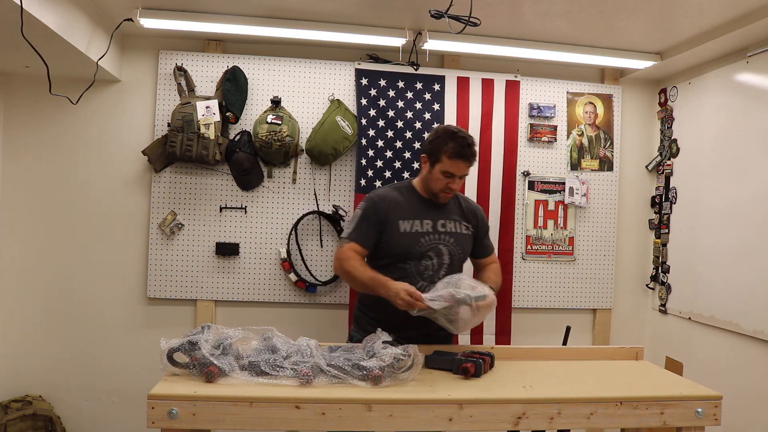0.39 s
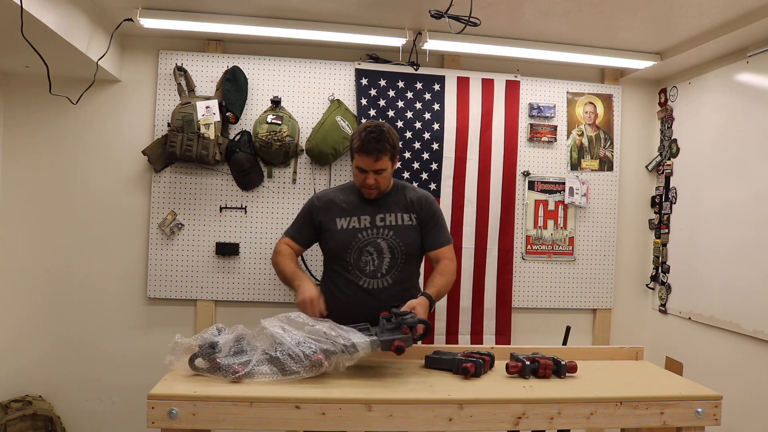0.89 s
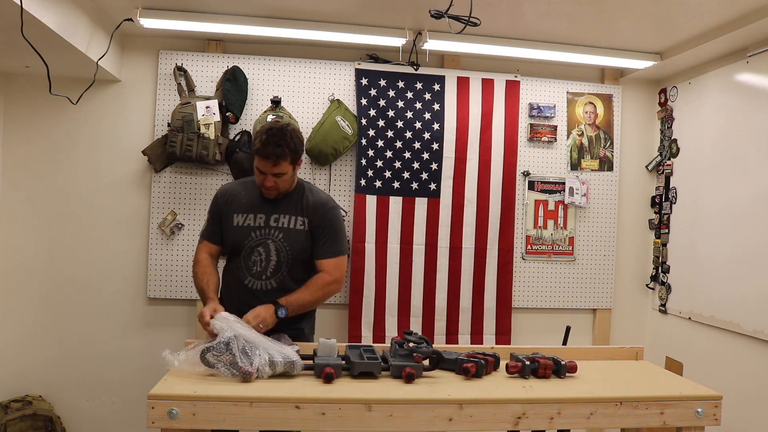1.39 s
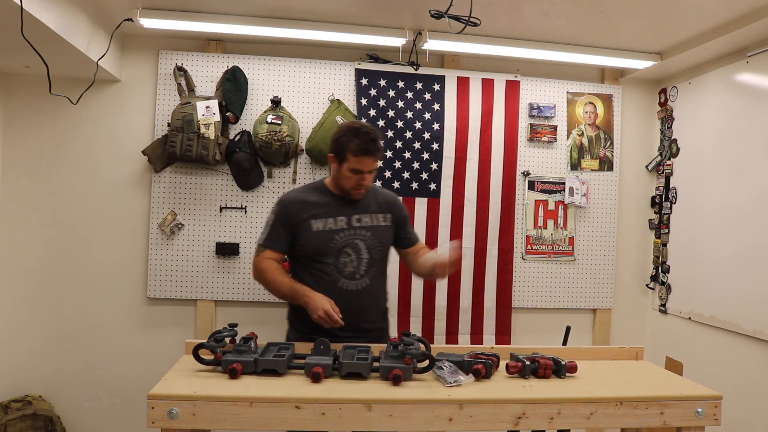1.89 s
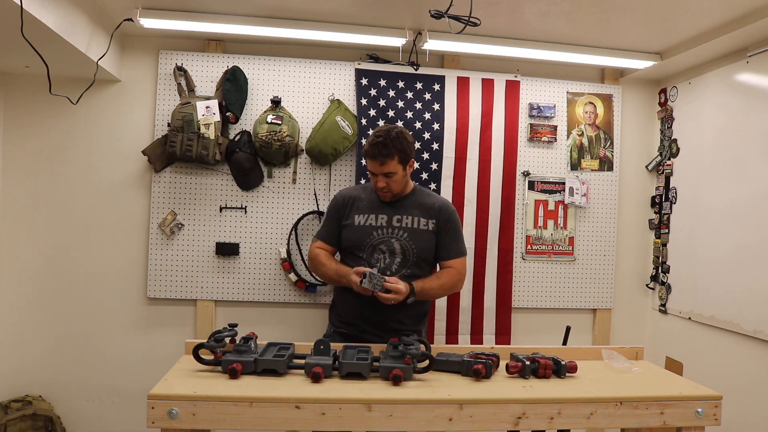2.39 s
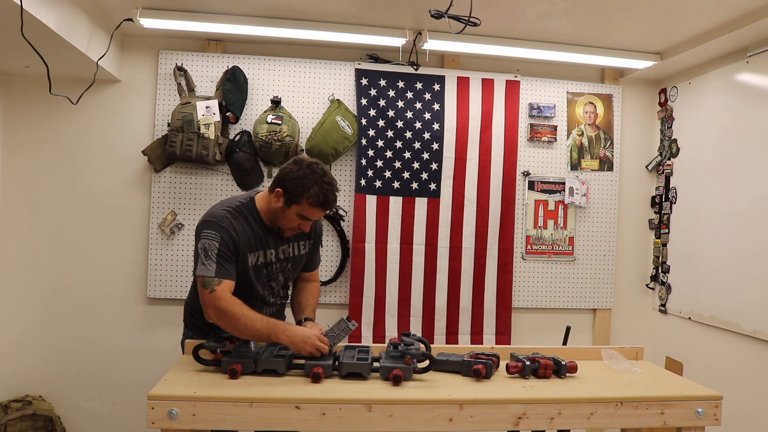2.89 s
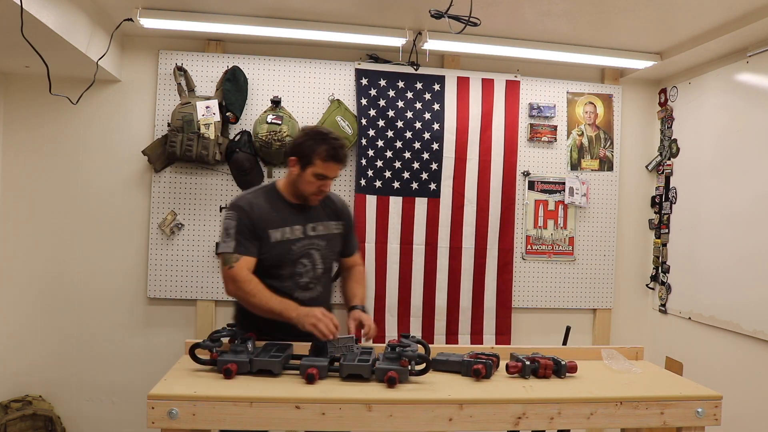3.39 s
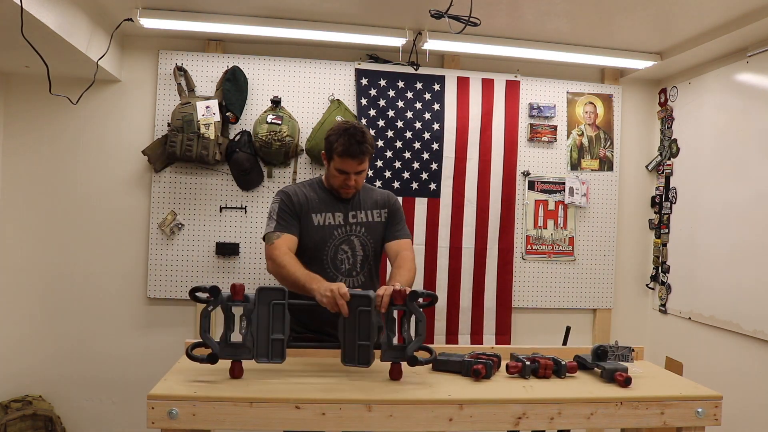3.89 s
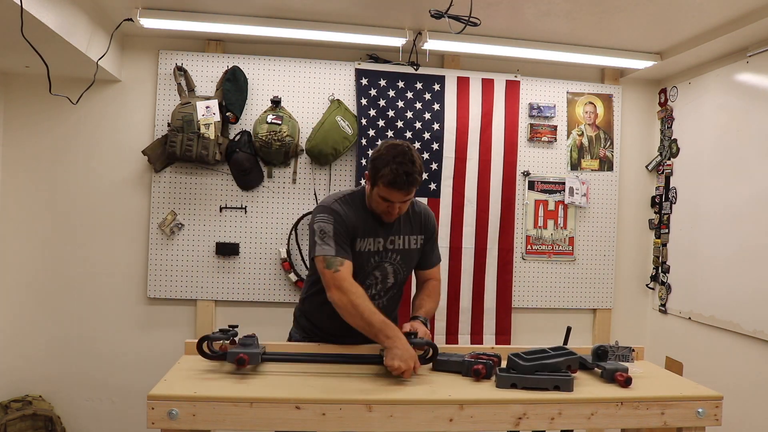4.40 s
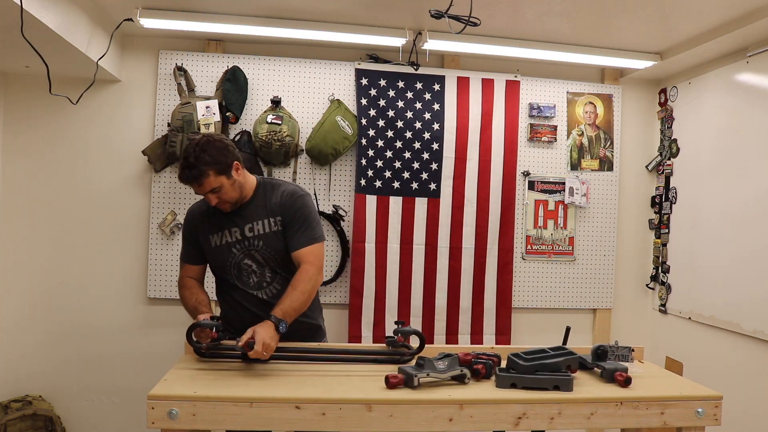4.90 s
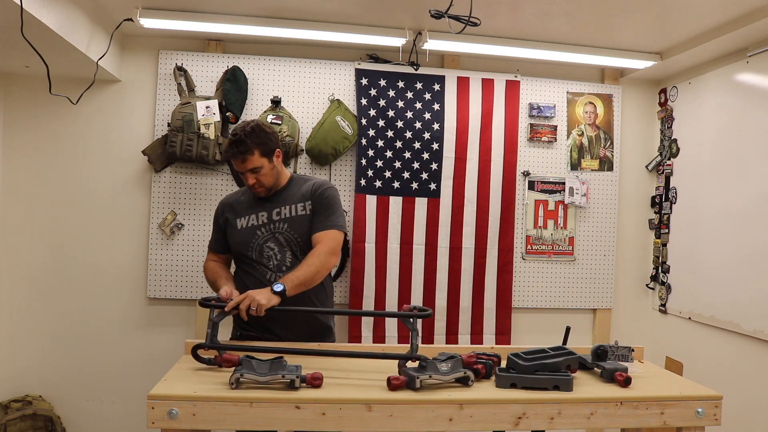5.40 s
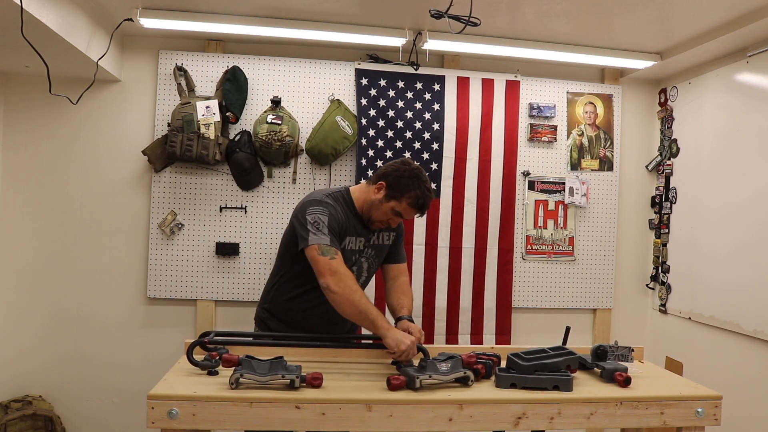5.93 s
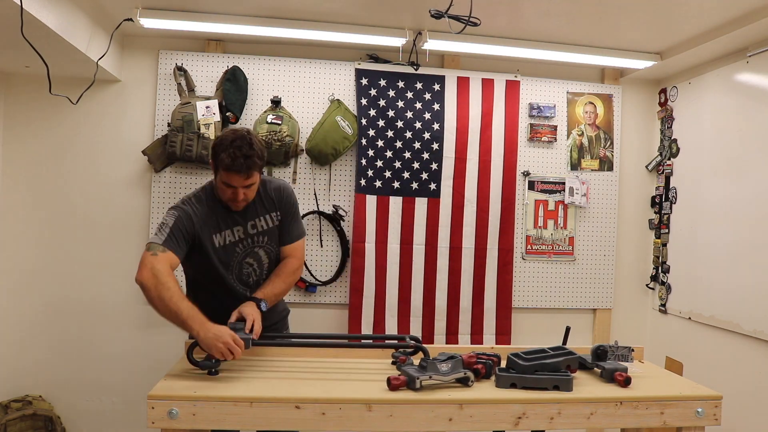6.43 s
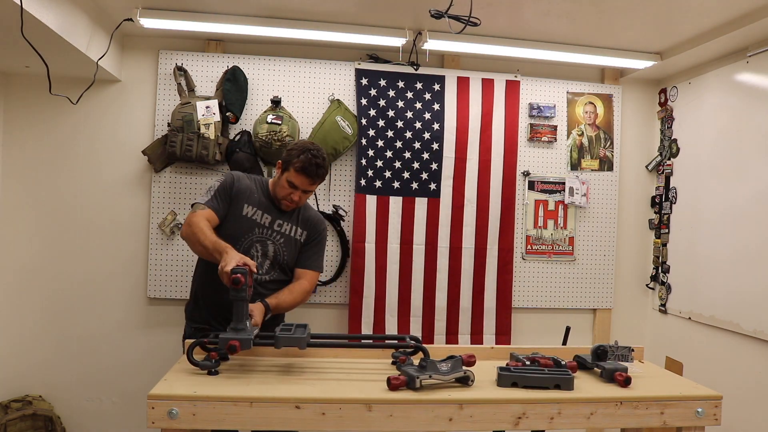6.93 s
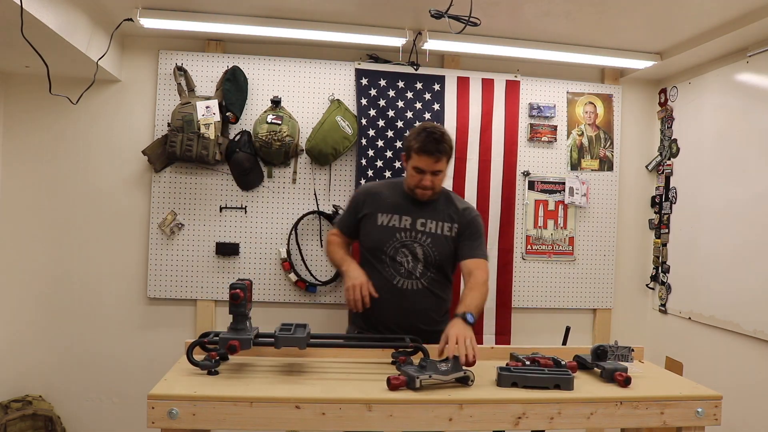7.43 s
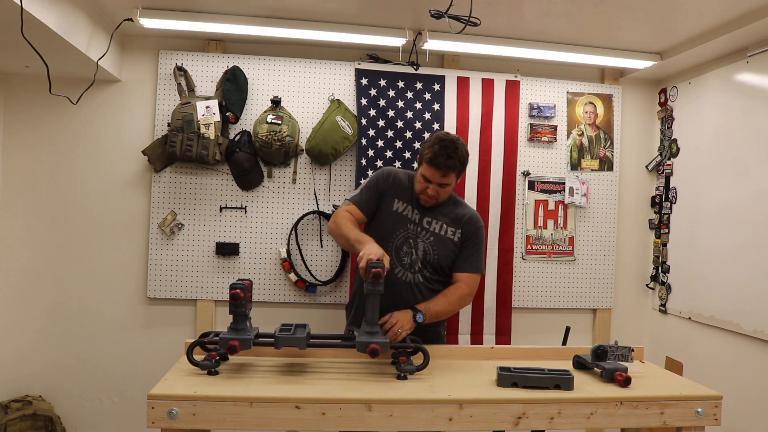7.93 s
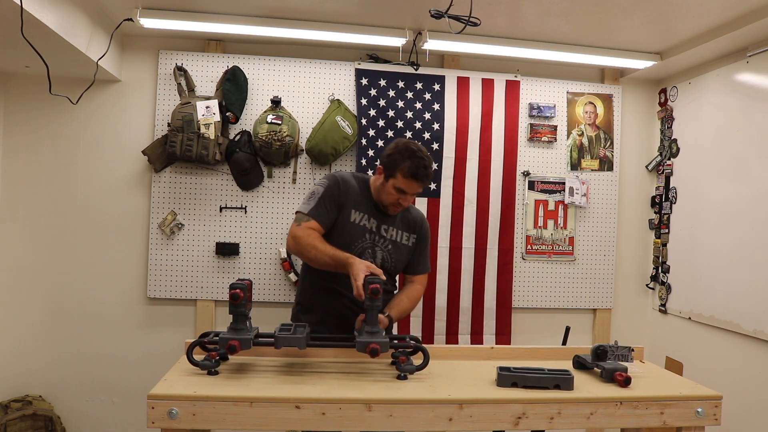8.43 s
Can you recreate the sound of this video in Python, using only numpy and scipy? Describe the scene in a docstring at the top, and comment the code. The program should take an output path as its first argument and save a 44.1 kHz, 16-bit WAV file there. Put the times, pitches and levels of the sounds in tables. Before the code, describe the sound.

Hands work about twenty times too fast at a wooden bench in a small room. Plastic bags crinkle densely while hard metal and plastic parts tick and knock. Around two seconds the bags come off in quick swishes, then drier clicks, sliding clamps and rubbing follow, thickest near four to five seconds, sparser later. Close microphone, slightly squashed peaks, with faint hiss and a thin high lamp tone.

```python
"""A thin high lamp hum, hiss and rustling bags sound from the start: handling at a wooden bench in a small
room, played about twenty times too fast. Almost at once knocks of metal and plastic parts join in as ticks
of 10 ms: noise cracks that ring modes of bench and parts. Near 2 s bags come off in noise swishes, then
clamps slide, the bench is rubbed and a knob is turned, all as noise that rises and falls, with knocks and
light taps in between, almost to the end."""
import sys
import numpy as np
from scipy import signal
from scipy.fft import rfft, irfft, next_fast_len
from scipy.io import wavfile
from scipy.ndimage import uniform_filter1d

SR = 44100
rng = np.random.default_rng(int(sys.argv[2]) if len(sys.argv) > 2 else 0)


def generate_wav(sig):
    """Save sig (samples, or channels by samples) to the path in sys.argv[1] as 16-bit PCM at SR."""
    pcm = np.round(np.clip(np.atleast_2d(sig).T, -1, 1) * 32767).astype(np.int16)
    wavfile.write(sys.argv[1], SR, pcm)


def volts_from_decibels(level):
    """Turn decibel levels (scalar or array-like) into linear amplitude factors."""
    exponent = np.asarray(level, float) / 20
    return 10 ** exponent


N = 377496   # length in samples


def rms_one(x):
    """Scale to rms 1."""
    return x / np.sqrt(np.mean(x ** 2) + 1e-20)


def drift(rate_hz):
    """Slow random wandering with rms 1, made at every 20th sample and joined by straight lines."""
    r = np.exp(-40 * np.pi * rate_hz / SR)
    slow = signal.lfilter([1], [1, -2 * r, r * r], rng.standard_normal(N // 20 + 4002))[4000:]
    return np.interp(np.arange(N) / 20, np.arange(len(slow)), rms_one(slow))


def cut(x, kind, hz):
    """Second-order Butterworth filter."""
    return signal.sosfilt(signal.butter(2, hz, kind, fs=SR, output="sos"), x)


def wide(share):
    """Stereo noise with a share that differs left and right."""
    mid, side = rng.standard_normal((2, N))
    return mid + share * side * [[1], [-1]]


def swell(x, peak_s):
    """Each value rises to its height after peak_s and falls off quickly."""
    r = np.exp(-1 / (peak_s * SR))
    return signal.lfilter([0, np.e / (peak_s * SR)], [1, -2 * r, r * r], x + 1e-18)


def strokes(rows, idle_db):
    """Gain that swells from idle and falls back with each stroke."""
    t, gain = np.arange(N) / SR, volts_from_decibels(idle_db)
    for start_s, length_s, db in rows:
        gain = gain + volts_from_decibels(db) * np.sin(np.pi * np.clip((t - start_s) / length_s, 0, 1))
    return gain


def low_thumps(at, db):
    """Dull, short thumps of low noise, stronger on the right and unlike in the two channels."""
    thump = np.bincount(at, volts_from_decibels(db), N)
    return cut(wide(0.89) * swell(thump, 0.00092), "low", 1290) * volts_from_decibels([[-1.7], [1.7]])


# steady lamp and fan tones: (frequency [Hz], level [dB rms])
LAMP_TONES = [(576, -76), (765, -73), (2401, -51), (4802, -68)]


def hum():
    """Steady sine tones whose phase wavers a little."""
    t, out = np.arange(N) / SR, 0
    for hz, db in LAMP_TONES:
        out = out + np.sqrt(2) * volts_from_decibels(db) * np.sin(2 * np.pi * hz * t + 0.13 * drift(5.1))
    return out


# humps of room noise: (centre [Hz], width [Hz], level [dB rms])
ROOM_NOISE = [(960, 142, -62.5), (1800, 80, -68.5), (2400, 62, -63)]


def room_noise():
    """Noise bands, the same in both channels."""
    out = 0
    for hz, width, db in ROOM_NOISE:
        band = cut(rng.standard_normal(N), "band", [hz - width / 2, hz + width / 2])
        out = out + volts_from_decibels(db) * rms_one(band)
    return out


# tone colour of the hiss, shape only: (frequency [Hz], relative level [dB])
HISS_COLOUR = [(30, -5), (450, -4.5), (700, 2.5), (3000, 11.5), (16000, -5)]


def hiss():
    """Coloured background noise, partly its own in each channel."""
    hz = np.maximum(np.arange(N // 2 + 1) * SR / N, 1)
    colour_hz, colour_db = np.transpose(HISS_COLOUR)
    colour = volts_from_decibels(np.interp(np.log(hz), np.log(colour_hz), colour_db))
    mid, side = irfft(rfft(rng.standard_normal((2, N))) * colour, N)
    return volts_from_decibels(-57) * rms_one(mid + 0.13 * side * [[1], [-1]])


def strike(at, db, modes, t60_s, chatter_s):
    """Every blow, and the chatter after it, rings every mode with a strength and sign of its own."""
    out, luck = np.zeros(N), rng.standard_normal((len(at), len(modes), 2))
    for k, (hz, mode_db) in enumerate(modes):
        blow_db = db + mode_db + 3.5 * np.clip(luck[:, k, 0], -2, 1)
        blows = np.bincount(at, volts_from_decibels(blow_db) * np.sign(luck[:, k, 1]), N)
        drive = blows + volts_from_decibels(-17.0) * swell(blows, chatter_s) * rng.standard_normal(N)
        r, w = volts_from_decibels(-60 / (t60_s * SR)), 2 * np.pi * hz / SR
        out += signal.lfilter([0, np.sin(w)], [1, -2 * r * np.cos(w), r * r], drive)
    return out


# tones at which hollow things ring: (frequency [Hz], relative level [dB])
HOLLOW_MODES = [(1520, -3), (1780, -1.7), (2900, -1), (3150, 1.5), (3500, -1), (3900, -1.5)]
# tones at which the bench rings: (frequency [Hz], relative level [dB])
BENCH_MODES = [(4450, -4), (4790, 0.1), (5200, -3)]
# tones at which the small parts ring: (frequency [Hz], relative level [dB])
PART_MODES = [(7600, 0), (9000, 3.6), (9900, -6), (11200, -0.5), (13300, -19.5), (15200, -13.5)]
HOLLOW_T60_S, BENCH_T60_S, PARTS_T60_S = 0.017, 0.021, 0.0056   # time to ring down by 60 dB


def contacts(at, crack_db, bench_db, hollow_db, sharp_db, chatter_s):
    """A contact: a bright crack, ragged chatter and three families of modes."""
    crack = np.bincount(at, volts_from_decibels(crack_db), N)
    sound = volts_from_decibels(sharp_db) * cut(wide(0.096) * swell(crack, 0.00053), "high", 3560)
    ragged = volts_from_decibels(5.4 * drift(350))
    sound += volts_from_decibels(-17.0) * cut(wide(0.43) * ragged * swell(crack, chatter_s), "high", 2620)
    sound += strike(at, crack_db - 19.5, PART_MODES, PARTS_T60_S, chatter_s)
    bench = strike(at, crack_db + bench_db - 17.0, BENCH_MODES, BENCH_T60_S, chatter_s)
    sound += cut(bench, "band", [4000, 5700])
    return sound + strike(at, crack_db + hollow_db - 16.5, HOLLOW_MODES, HOLLOW_T60_S, chatter_s)


# how busy the hands are, as the reference level of their rustle: (time [s], level [dB])
BUSY_HANDS = [(0, -46), (0.3, -52.5), (1.1, -46), (2.3, -52.5), (2.5, -57), (2.85, -58.5), (2.95, -52),
              (3.3, -52), (3.55, -57.5), (3.82, -44), (4.05, -55.5), (4.9, -52.5), (5.15, -53),
              (5.6, -60.5), (5.9, -53.5), (6.45, -53), (7.1, -56), (7.5, -50.5), (8.0, -61.5), (8.56, -53)]


def rustle_level():
    """Level that glides in straight lines between the given times."""
    return np.interp(np.arange(N) / SR, *np.transpose(BUSY_HANDS))


TOUCHES_PER_S, TOUCH_FOLLOWS = 99, 0.68   # base rate at mean rustle; busier hands touch more often


def touches(rustle_db, rumble_db):
    """Many short contacts in random clumps, each with a low thump; also gives their times and luck."""
    busier_db = TOUCH_FOLLOWS * (rustle_db - rustle_db.mean()) + 3 * drift(12)
    at = np.flatnonzero(rng.random(N) < TOUCHES_PER_S * volts_from_decibels(busier_db) / SR)
    luck = np.clip(rng.standard_normal((len(at), 3)), -2, 1)
    touch_db = 5 * luck[:, 0]
    sound = contacts(at, rustle_db[at] + 16.5 + touch_db, -9 + 3 * luck[:, 1], -15.5,
                     sharp_db=-10, chatter_s=0.0013)
    thumps = low_thumps(at, rumble_db[at] + 19.0 + touch_db + 3.3 * luck[:, 2])
    return sound, thumps, at, touch_db


def crinkle(rustle_db, bags, flutter, slips):
    """Bags, sleeves and fingers crinkle in dense, clumped snaps of noise."""
    snaps = rms_one(cut(wide(0.81) * swell(slips, 0.00058), "band", [2700, 5600]))
    return (bags + 0.43) * volts_from_decibels(rustle_db - 10.5) * flutter * snaps


# a bag is pulled off in one swish: (start [s], length [s], stroke level [dB])
BAG_SWISHES = [(1.745, 0.043, -36.5), (2.0, 0.064, -44), (2.12, 0.15, -38.5)]


def swish(rustle_db, knob, flutter):
    """Fluttering bright noise swells with each bag pull and, more softly, each knob turn."""
    gain = strokes(BAG_SWISHES, rustle_db - 4.5) + volts_from_decibels(-4) * knob
    return gain * flutter * rms_one(cut(wide(0.76), "high", 1200))


# clamps slid along: (start [s], length [s], stroke level [dB])
CLAMP_STROKES = [(2.85, 1.05, -52)]
# rubs on the bench: (start [s], length [s], stroke level [dB])
BENCH_STROKES = [(2.95, 0.58, -57), (5.3, 1.3, -58), (6.9, 0.65, -57)]
# rasping knob turns: (start [s], length [s], stroke level [dB])
KNOB_STROKES = [(5.62, 0.4, -48)]


def rubbing(rustle_db):
    """Gains of clamp, bench and knob; between strokes they only stir, at a level below the rustle."""
    clamp = strokes(CLAMP_STROKES, rustle_db - 32)
    bench = strokes(BENCH_STROKES, rustle_db - 15.5)
    knob = strokes(KNOB_STROKES, rustle_db - 11)
    return clamp, bench, knob


def friction(clamp, bench, knob, grip):
    """Friction keeps the bench and small parts ringing in narrow noise bands, most of all at each grip."""
    out = 0
    bands = [(bench, [4600, 5000]), (knob, [8700, 9300]), (clamp, [10800, 11500]),
             (clamp / 2, [9700, 10200]), (clamp / 2, [15100, 15700])]
    for gain, band_hz in bands:
        out = out + gain * grip * rms_one(cut(wide(0.085), "band", band_hz))
    return out + volts_from_decibels(-5) * knob * grip * rms_one(cut(wide(0.54), "band", [7200, 15000]))


BAGS_GONE_S, BAGS_FADE_S = 2.46, 0.013
EARLY_RUMBLE_DB, LATE_RUMBLE_DB = -8.5, -16   # low rumble against the mean rustle, before and after 2.46 s
RUMBLE_FOLLOWS = 1.3   # dB of late rumble per dB of rustle
SLIPS_PER_S, SLIP_SPREAD_DB = 350, 11.5


def handling():
    """Touches, fluttering rustle and friction over a low rumble, until 2.46 s at a level of its own."""
    rustle_db = rustle_level()
    mean_db = rustle_db.mean()
    clamp, bench, knob = rubbing(rustle_db)
    bags = np.clip((BAGS_GONE_S - np.arange(N) / SR) / BAGS_FADE_S, 0, 1)   # 1 while bags are there
    swing_db = RUMBLE_FOLLOWS * (rustle_db - mean_db) * (1 - bags)
    rumble_db = mean_db + bags * EARLY_RUMBLE_DB + (1 - bags) * LATE_RUMBLE_DB + swing_db
    sound, low, at, touch_db = touches(rustle_db, rumble_db)
    flutter = volts_from_decibels(3.85 * drift(30))
    slip_db = SLIP_SPREAD_DB * np.clip(rng.standard_normal(N), -2, 2) - 17.5
    slips = (rng.random(N) < SLIPS_PER_S / SR) * volts_from_decibels(slip_db)
    tap_s, tap_db = np.transpose(LIGHT_TAPS)
    taps = np.bincount((tap_s * SR).astype(int), volts_from_decibels(tap_db + 32.0), N)
    grip = rms_one(0.19 + swell(np.bincount(at, volts_from_decibels(touch_db), N) + taps + slips, 0.00081))
    sound += crinkle(rustle_db, bags, flutter, slips)
    sound += swish(rustle_db, knob, flutter)
    sound += friction(clamp, bench, knob, grip)
    low += volts_from_decibels(rumble_db - 2.0) * flutter * rms_one(cut(wide(1.0), "low", 1500))
    return sound, low


# knocks: (time [s], crack level [dB], bench ring against the crack [dB])
HARD_KNOCKS = [(.0023, -4, -2), (0.0134, 0, 7), (0.0218, -6.5, 5), (0.0394, -20, 11), (.116, -8, 5),
               (0.1325, 6.5, -4), (0.1384, -3, 0), (0.1557, -7, -14), (0.2048, -8.5, 4),
               (0.2188, -12.5, 7.5), (0.3058, -6.5, 10), (0.325, -3.5, 8.5), (0.3713, -20.5, 3),
               (0.4167, -19, -25), (.5151, -3.5, 8), (0.5361, -11.5, 8), (0.8541, -2.5, -11.5),
               (0.9636, -8, -10), (0.9997, -6, -25), (1.134, -15, -7), (1.1674, 1.5, -21.5),
               (1.1831, -6, 5.5), (1.2274, -12.5, -2), (1.287, -14.5, 0.5), (1.358, -7.5, -1),
               (1.3871, -1.5, -20.5), (1.423, -10.5, -7), (1.506, -15, -33), (1.5874, -4.5, -11),
               (1.594, -10.5, 0), (1.6713, -17.5, 3.5), (1.7188, -4, -12), (1.723, -12, 0),
               (1.827, -2.5, -11.5), (1.835, -11.5, 0), (1.9293, -7.5, -34), (2.0639, -3.5, -24),
               (2.2483, -14.5, -20.5), (2.3567, -11, -30), (2.883, -18, 0), (2.9029, 0.5, -24.5),
               (2.918, -14.5, -27), (2.9522, -15, -24), (3.057, -20, -17), (3.3397, -21, -6),
               (3.3947, -10.5, -23), (3.431, -7.5, -16.5), (3.642, -8.5, -14), (3.6765, 1.5, -22.5),
               (3.6862, -8, -0.5), (3.7104, -7.5, -19), (3.7353, -10.5, -27), (3.7921, -5.5, -10),
               (3.8072, -19, 2), (3.8388, -18, -26), (3.8473, -1, -11), (3.8634, -27, -24),
               (3.8772, -8, -16), (3.944, -18, -26), (4.048, -3.5, -26), (4.059, -8, -3), (4.115, -19, -9),
               (4.1934, -4.5, -5), (4.2026, -6.5, 1), (4.3324, -15, -4), (4.357, -6, -1), (4.3665, -4, -4),
               (4.3763, -3, -9), (4.407, 0.5, -19), (4.525, -21.5, -18), (4.5558, -4, -29),
               (4.57, -0.5, -3.5), (4.5857, -2, -2), (4.6068, -12.5, -9), (4.664, -22.5, -4),
               (4.6762, -14.5, -11), (4.717, -3, -10.5), (4.7405, -6.5, -9.5), (4.753, 1.5, -21.5),
               (4.77, -11, -31), (4.8039, -1.5, -24), (4.8123, -10.5, -2.5), (4.836, -22, 0),
               (4.8817, 0.5, -17.5), (4.8992, -13.5, -2), (4.9388, -9, -11), (4.952, -0.5, -21),
               (4.9708, -12, -20), (4.984, 2, -19), (5.0023, -1, -22), (5.022, 1.5, -14),
               (5.034, -10.5, -5), (5.0486, -12.5, -2), (5.1152, -6, -10), (5.387, -17, -25),
               (5.409, -8, -30), (5.4145, -9, -5), (5.5145, -2.5, -2.5), (6.2115, -7, -10),
               (6.2191, -11.5, -6), (6.2514, -12.5, -7), (6.333, -22.5, -1), (6.3685, -17, -19),
               (6.382, -2, -25), (6.3958, -17, -25), (6.4163, -2.5, -14), (6.6598, -18, 0),
               (6.769, -16.5, -25), (6.7967, -8.5, -14), (6.8126, 0, -28.5), (6.8286, -11, 1),
               (6.9097, -12, -12), (6.961, -18.5, -5), (6.9767, -18.5, -16), (7.2603, -10, -22),
               (7.283, -20, -18), (7.3083, -2.5, -7), (7.522, -12, -7), (7.5706, -14, -20),
               (7.6, -1, -22.5), (7.618, 1, -23), (7.635, -18, -11), (7.8594, -15, 1), (7.9231, -16, -13),
               (7.9396, -19.5, -5), (8.111, -6.5, -17), (8.1192, -12.5, -9), (8.2085, -18, -26),
               (8.2421, -15, -15), (8.2603, -13.5, -13), (8.282, -12.5, -23.5), (8.3847, -11.5, -25.5),
               (8.4123, -24, -13), (8.4369, -4.5, -17.5), (8.448, -13, -10)]
# how hollow the part in hand rings: (picked up at [s], ring against the crack of a firm knock [dB])
HELD_PARTS = [(0, -12), (.12, -5.5), (.8, -13.5), (2.5, -14.5), (4.65, -23.5), (5.0, -12), (6.1, -21),
              (6.75, -12), (7.8, -6)]
# light taps of fingers and loose parts, which also stir the friction: (time [s], crack level [dB])
LIGHT_TAPS = [(0.5578, -21.5), (0.678, -26.5), (0.7737, -33), (0.939, -24), (0.9548, -14), (1.1014, -23),
              (1.374, -17), (2.2967, -27.5), (2.4004, -25), (2.7248, -27.5), (2.8126, -25), (2.9348, -25),
              (3.036, -28), (3.1088, -25.5), (3.1415, -20), (3.1877, -29), (3.225, -32), (3.3224, -23.5),
              (3.3722, -20.5), (3.6125, -22), (3.8924, -18), (4.437, -23.5), (4.5136, -32), (5.3277, -25.5),
              (6.1306, -24.5), (6.438, -26), (6.5215, -23.5), (6.5527, -22.5), (6.698, -26),
              (7.1232, -25.5), (7.4738, -26)]
# dull low thumps: (time [s], relative level [dB])
DULL_THUDS = [(1.8305, -13), (2.0624, -27), (3.4318, -30), (4.0474, -22), (4.058, -16), (4.1946, -21),
              (4.571, -21.5), (4.589, -24.5), (5.0337, -19), (5.515, -27), (6.7971, -20.5), (8.4466, -28.5)]
TAP_BENCH_DB = -12   # bench ring of a tap against its crack
FIRM_DB, HOLLOW_FOLLOWS = -12.5, 0.84   # softer knocks lose crack faster than hollow ring


def knocks():
    """Parts set down, bumped and clicked: blows that reach the bench chatter long, the others stop short."""
    taps = [(s, db, TAP_BENCH_DB) for s, db in LIGHT_TAPS]
    s, crack_db, bench_db = np.transpose(list(HARD_KNOCKS) + taps)
    picked_s, part_db = np.transpose(HELD_PARTS)
    in_hand = np.maximum(np.searchsorted(picked_s, s) - 1, 0)
    hollow_db = part_db[in_hand] - (1 - HOLLOW_FOLLOWS) * (crack_db - FIRM_DB)
    hollow_db = hollow_db + 3.5 * np.clip(rng.standard_normal(len(s)), -2, 1)
    at = (s * SR).astype(int)
    # share of the blow's power that chatters long
    lasting = np.clip((bench_db + 23.0) / 24, .01, .99)
    long_db, short_db = 10 * np.log10(lasting), 10 * np.log10(1 - lasting)
    sound = contacts(at, crack_db + long_db, bench_db, hollow_db, sharp_db=-5.5, chatter_s=0.0023)
    sound += contacts(at, crack_db + short_db, bench_db, hollow_db, sharp_db=-24, chatter_s=0.00085)
    # the snap of the first instant
    snap = np.bincount(at, volts_from_decibels(crack_db - 16.5), N)
    sound += cut(wide(0.41) * swell(snap, 0.00011), "high", 1900)
    thud_s, thud_db = np.transpose(DULL_THUDS)
    thump_at = np.r_[at, (thud_s * SR).astype(int)]
    return sound, low_thumps(thump_at, np.r_[crack_db - 22, thud_db + 7])


ROOM_T60_S, ROOM_DB = 0.023, -7.5   # time to die down by 60 dB; gain of the room sound


def room(x):
    """Six feedback delays a side, twenty times shorter than the real walls give."""
    size = next_fast_len(N + SR // 4)
    turn = -2j * np.pi * np.arange(size // 2 + 1) * SR / size
    echoes = np.zeros((2, size // 2 + 1), complex)
    for k, lag_s in enumerate(rng.uniform(0.00088, 0.0035, 12)):
        loop = volts_from_decibels(-60 * lag_s / ROOM_T60_S) * np.exp(turn * lag_s)
        echoes[k % 2] += loop / (1 - loop) * (-1) ** (k // 2)
    return irfft(echoes * rfft(x, size), size)[:, :N] / np.sqrt(6)


def scene():
    """Bench sounds with their room, over the steady background."""
    background = hum() + room_noise() + hiss()
    small, rumble = handling()
    loud, thumps = knocks()
    near = loud + small
    echo = volts_from_decibels(ROOM_DB) * room(cut(near.mean(axis=0), "low", 7900))
    return near * volts_from_decibels([[-.3], [.3]]) + echo + thumps + rumble + background


def band_limit(x):
    """A steep low-pass at the top of the band."""
    return signal.sosfilt(signal.butter(12, 17000, fs=SR, output="sos"), x)


# band that the microphone port weakens: (lower edge, upper edge) [Hz]
PORT_BAND = [5450, 6890]


def record(dry):
    """A dip in the treble, fast gain control that ducks loud moments, rounded peaks and a cut top."""
    dry = dry - 0.29 * cut(dry, "band", PORT_BAND)
    level_db = 10 * np.log10(uniform_filter1d(np.mean(dry ** 2, axis=0), size=33) + 1e-12)
    # hold each peak and let it sink by 900 dB per s, so the gain recovers within ms and flattens the tails
    ramp_db = 900 * np.arange(N) / SR
    held_db = np.maximum.accumulate(level_db + ramp_db) - ramp_db
    duck_db = -.4 * np.maximum(held_db + 26.5, 0)
    ducked = dry * volts_from_decibels(signal.lfilter([.08], [1, -.92], duck_db))
    top_cut = signal.cheby2(10, 60, 17000, fs=SR, output="sos")
    finished = signal.sosfilt(top_cut, np.tanh(ducked))
    return band_limit(finished)


dry = scene()
out = record(dry)
generate_wav(out)
```